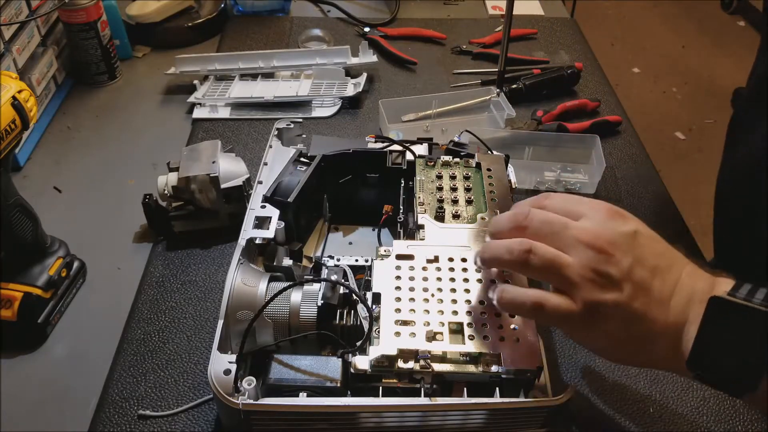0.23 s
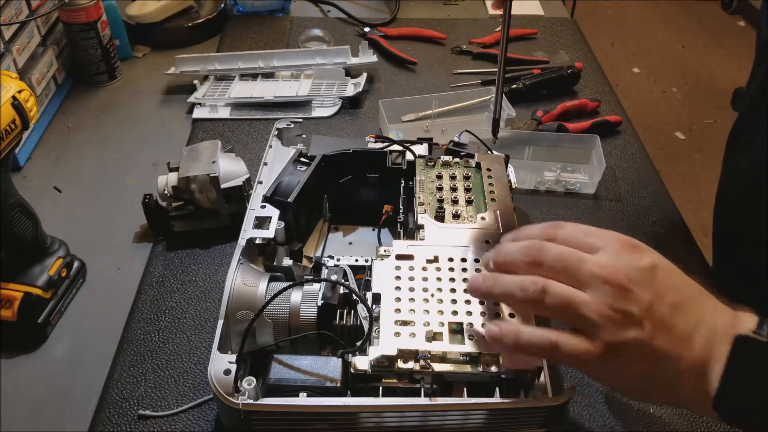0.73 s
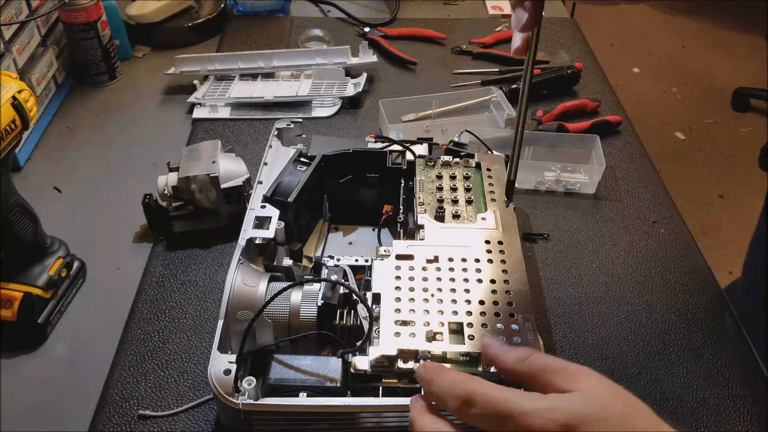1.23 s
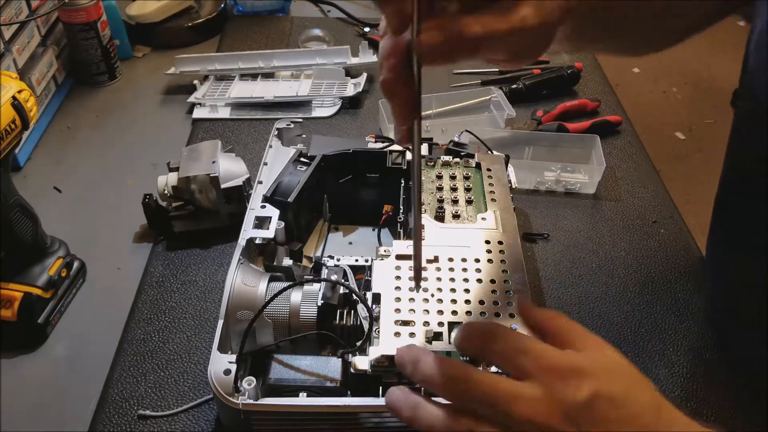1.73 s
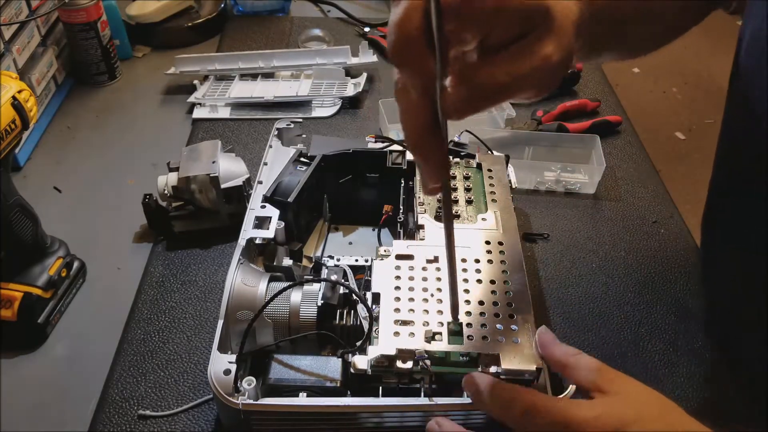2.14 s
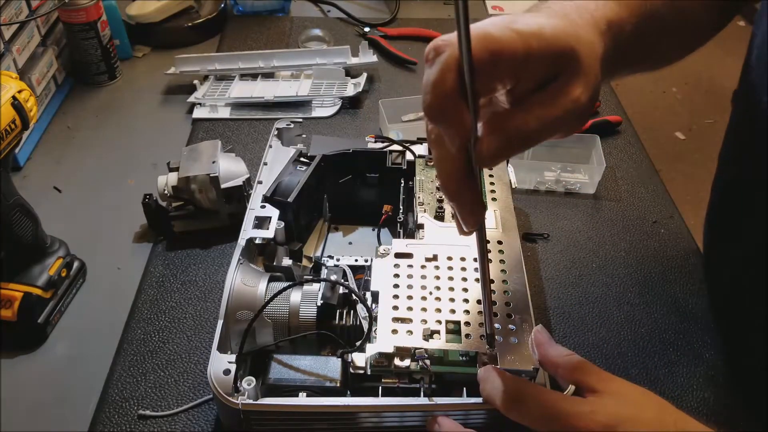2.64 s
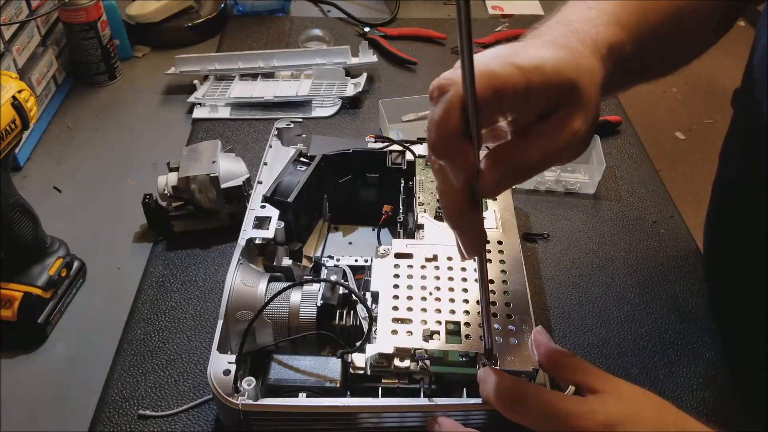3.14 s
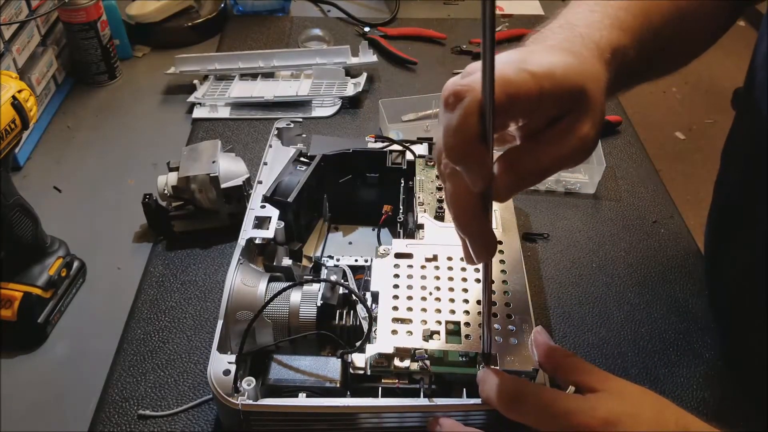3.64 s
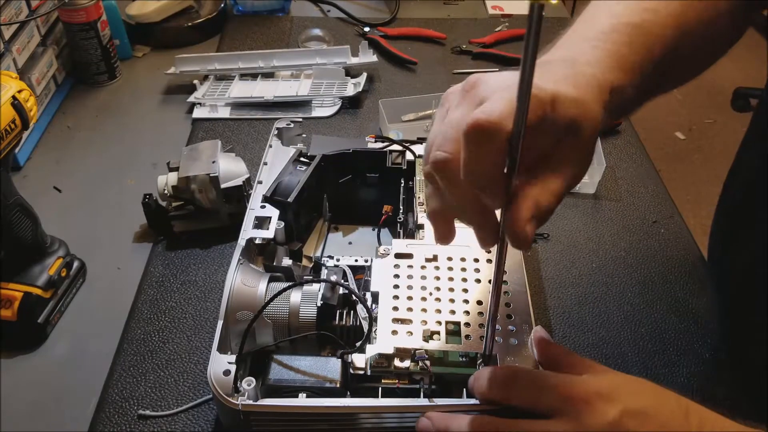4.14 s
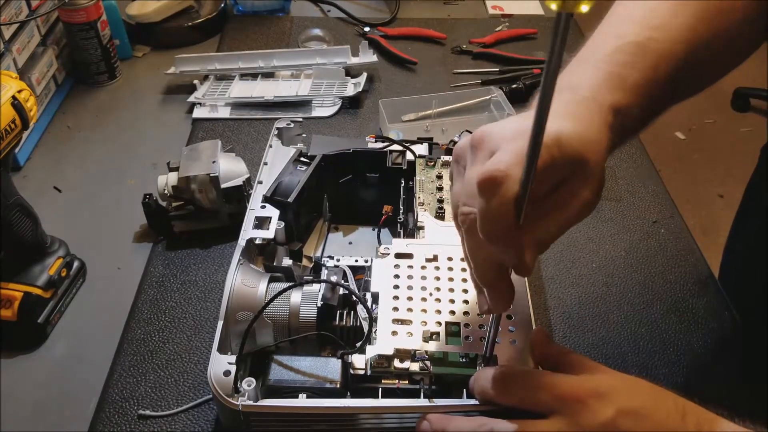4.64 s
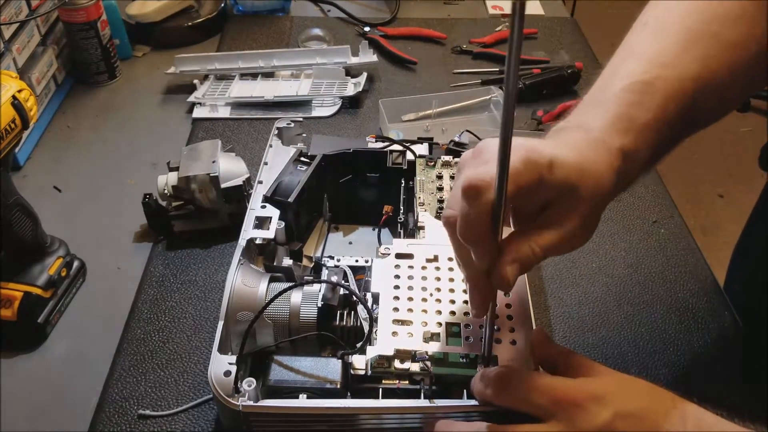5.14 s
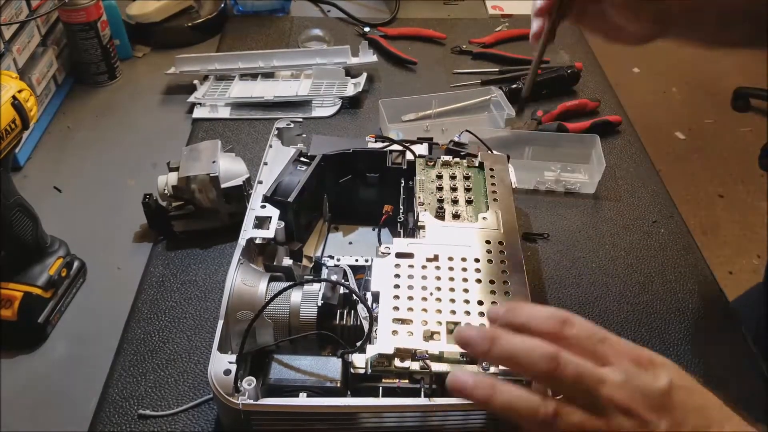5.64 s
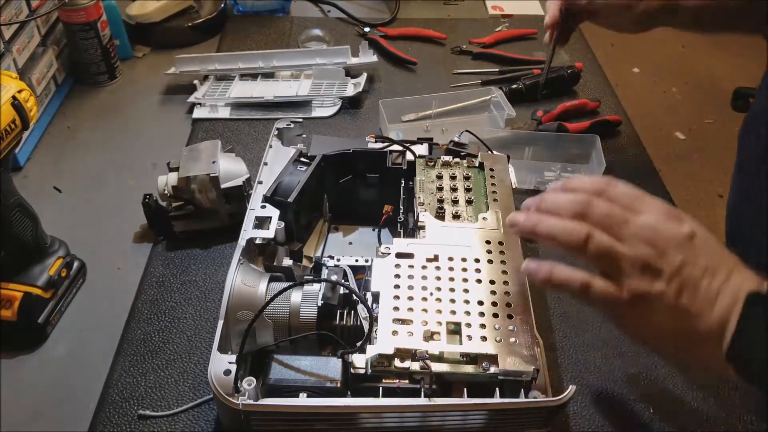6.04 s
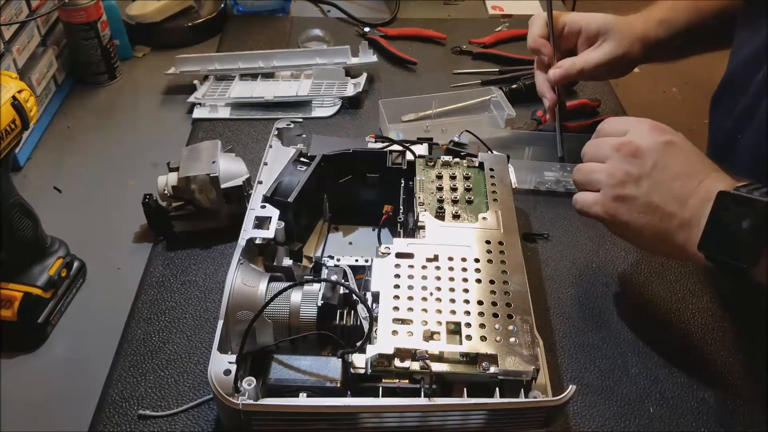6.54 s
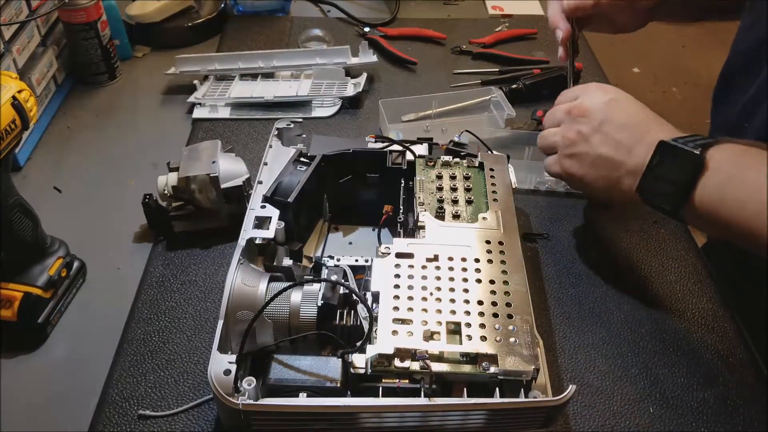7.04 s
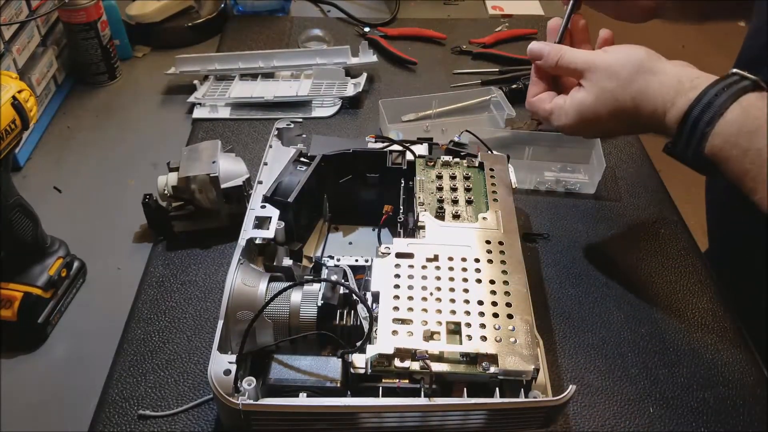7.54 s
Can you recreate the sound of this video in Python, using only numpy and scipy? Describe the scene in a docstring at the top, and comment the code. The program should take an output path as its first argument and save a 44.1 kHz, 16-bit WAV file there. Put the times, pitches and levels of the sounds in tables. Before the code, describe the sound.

Light metallic ticks, scrapes and a few ringing knocks as a small screw is driven in, with motors humming nearby.

```python
"""Screwdriver at the workbench

Close up, on a stereo pair in a small room: a small screw is driven into a perforated metal plate
in a plastic case. A hand slides over the case; the tip skids to the screw, grinds it round, squeaks,
knocks the plate into ringing and slips out. Later, loose screws tick in a tray.
Nearby motors hum and slowly beat, over ventilation rumble and hiss."""
import sys
import numpy as np
from scipy import signal
from scipy.fft import rfft, irfft, next_fast_len
from scipy.io import wavfile
from scipy.ndimage import map_coordinates

SR = 44100
rng = np.random.default_rng(int(sys.argv[2]) if len(sys.argv) > 2 else 0)


def persist_wave(psi):
    """Save psi, clipped to +-1, as 16-bit WAV."""
    counts = np.round(np.clip(psi, -1, 1) * 32767).astype(np.int16)
    wavfile.write(sys.argv[1], SR, np.atleast_2d(counts).T)


N = 342954
TIME = np.arange(N) / SR


# close up: first the plate ringing on around the knock at 3.64 s, then, in the later rows,
# the screw grinding round: (middle [s], length [s], level [dB], pitch [Hz])
PLATE_SWELLS = [(3.62, 0.095, -64, 1290), (4.095, 0.08, -54, 1950), (4.426, 0.055, -57.5, 2430),
                (4.484, 0.044, -57.5, 1220), (4.908, 0.075, -72, 1160), (5.041, 0.051, -75.5, 1300),
                (5.408, .048, -68, 1000), (5.511, .06, -68.5, 1350)]

def plate_swells(case_db=0.5, squeal_db=4.0, rasp_db_per_octave=7):
    """Plate and case sound on around a knock, or as the screw turns; higher swells rasp more."""
    out = np.zeros((2, N))
    for s, length, db, hz in PLATE_SWELLS:
        rasp_db = -4 + rasp_db_per_octave * np.log2(hz / 1970)
        layers = [(db, grinding), (db + rasp_db, rasping), (db + squeal_db, squeal(hz))]
        out += friction(s, length, layers, db + case_db)
    return out


# blows on the plate and, in the last two rows, the hand bumping the case: (time [s], slip [s], ring level [dB],
# ring centre [Hz], # then relative to the ring: crack [dB], ping [dB], thud [dB])
KNOCKS = [ (3.585, 0.0016, -51, 1020, -5.5, -8, -3), (3.643, 0.0016, -33, 1430, -8.5, -13, -23),
          (3.771, 0.0048, -55.5, 1800, -4, -5.5, -7), (3.9708, 0.0011, -27.5, 2300, -7.5, -7.5, -9.5),
          (4.349, 0.0034, -51.5, 1800, -17, -19, -8), (4.676, 0.012, -32.5, 1720, 6.5, -9, -17.5),
          (4.882, 0.0022, -60, 1910, -19, -23, -5), (5.387, .004, -70.5, 1100, -8, -20, 9),
          (5.816, .003, -65, 620, -20, -23, 10.5), (5.837, 0.0026, -54, 750, -24, -26, -5)]

def knocks(ping_hz=6300, top_hz=12600, crack_db_per_octave=21):
    """Blows ring the plate, ping the shaft and thud the case; a harder crack reaches higher. The hand's bumps
    on the case sound the same way, mostly thud."""
    return sum(contact(s, slip, db + crack, top_hz * 2 ** (crack / crack_db_per_octave),
                       db + ping, ping_hz, plate_db=db, plate_hz=hz, thud_db=db + thud)
               for s, slip, db, hz, crack, ping, thud in KNOCKS)


# the tip skids: (start [s], length [s], grinding level [dB], rasp over grinding [dB], squeal [Hz])
SKIDS = [ (0.446, 0.054, -67.5, 1, 4350), (1.352, 0.077, -71, 1, 1080), (1.597, .04, -65.5, -7, 1870),
         (1.83, 0.037, -67, 0, 1820), (2.168, 0.044, -65, -0.5, 810), (2.253, 0.049, -61.5, 2.5, 810),
         (2.439, .05, -74, 5, 3120), (3.17, .06, -61.5, 3, 3600), (5.534, 0.045, -53.5, 1.5, 840)]

def skids(landing_db=-1, case_db=-3, squeal_db=-3):
    """The tip lands with a click, then scrapes across the plate."""
    out = np.zeros((2, N))
    for s, length, db, rasp, hz in SKIDS:
        click_db = db + rasp + landing_db
        out += contact(s, slip=0.0048, crack_db=click_db, top_hz=10500, ping_db=click_db - 1,
                       ping_hz=6500, plate_db=db - 4, plate_hz=1560, thud_db=db - 11)
        layers = [(db, grinding), (db + rasp, rasping), (db + squeal_db, squeal(hz))]
        scrape = friction(s + length / 2, length, layers, db + case_db)
        out += scrape * (TIME > s)  # silent until the tip is down
    return out


# the tip swivels in the screw head: (middle [s], length [s], level [dB])
SQUEAKS = [(1.675, 0.037, -72), (2.342, 0.039, -62.5), (3.849, 0.038, -64.5), (3.939, .11, -65),
           (5.131, 0.052, -64.5), (5.324, 0.054, -71)]

def squeaks(lower_hz=3100, upper_hz=4260):
    """Under light pressure the tip squeaks, always near the same two pitches."""
    upper = lambda hz: bell(hz, upper_hz, width=.03)
    out = np.zeros((2, N))
    for s, length, db in SQUEAKS:
        layers = [(db, squeal(lower_hz)), (db - 8, upper), (db - 7, grinding), (db - 4, rasping)]
        out += friction(s, length, layers, case_db=db - 6)
    return out


# light clicks of the tip on the screw head: (time [s], slip [s], ping level [dB], ping [Hz])
TIP_TICKS = [(.45, .003, -59, 6860), (2.347, .008, -62, 4150), (3.167, 0.0026, -53.5, 4800),
             (3.495, .0008, -52, 11900), (3.57, .001, -60.5, 7300), (3.832, 0.0043, -72, 3900),
             (5.168, .001, -59, 3700), (5.525, 0.0013, -53.5, 7250), (5.624, 0.0018, -42.5, 6800)]

def tip_ticks():
    """Steel on steel: mostly ping, and the plate barely answers."""
    return sum(contact(s, slip, crack_db=db - 6, top_hz=13500, ping_db=db, ping_hz=hz, plate_db=db - 17)
               for s, slip, db, hz in TIP_TICKS)


# screws picked over in the tray: (time [s], slip [s], ping level [dB], ping [Hz])
TRAY_TICKS = [(6.567, 0.001, -56.5, 13100), (6.589, 0.011, -63.5, 7100), (7.229, .006, -73, 4940),
              (7.564, 0.0027, -63.5, 11400)]

def tray_ticks():
    """Loose screws touch each other, away from the plate."""
    return sum(contact(s, slip, crack_db=db - 3, top_hz=2 * hz, ping_db=db, ping_hz=hz)
               for s, slip, db, hz in TRAY_TICKS)


# a hand on the case: (middle [s], length [s], level [dB])
RUBS = [(1.047, 0.084, -65.5), (1.162, 0.19, -65.5), (1.27, 0.072, -66.5), (1.399, 0.099, -60),
        (5.866, 0.074, -57.5)]

def hand_rubs(boom_hz=235):
    """Skin rubs dully on the hollow case."""
    return sum(friction(s, length, [(db - 1, squeal(boom_hz)), (db - 15, grinding)], case_db=db)
               for s, length, db in RUBS)


# fingers on smooth steel: (middle [s], length [s], level [dB], hiss centre [Hz])
SLIDES = [(0.423, 0.21, -79.5, 8200), (.84, 0.26, -75, 8440), (1.2, 0.54, -76, 8260),
          (1.597, 0.16, -77, 8030), (1.924, 0.059, -69, 7550)]
# a lower resonance under the long slide: (middle [s], length [s], level [dB], centre [Hz])
SLIDE_DRONE = (1.07, .5, -79, 2126)

def finger_slides():
    """Skin slides along the steel with two narrow strands of hiss and, once, a lower drone."""
    def strands(centre_hz):
        return lambda hz: bell(hz, centre_hz, 0.065) + amp(-7) * bell(hz, 0.8 * centre_hz, 0.044)
    hiss = sum(friction(s, length, [(db, strands(hz))], grain_db=2.0) for s, length, db, hz in SLIDES)
    s, length, db, drone_hz = SLIDE_DRONE
    drone = friction(s, length, [(db, lambda hz: bell(hz, drone_hz, width=0.037))], grain_db=4.0)
    return hiss + drone


# colour of the rubbed case: (frequency [Hz], level [dB])
CASE_RUB = [(70, -16), (140, 0), (280, -0.5), (420, -1), (600, -10), (850, -14.5), (1500, -13), (4000, -44)]

def friction(s, length, layers, case_db=-120, grain_db=1.5, echo_s=0.018, wet=0.26):
    """Friction swells and fades around time s in tiny uneven slips; layers are (level [dB], colour)."""
    t = np.arange(SR) / SR - .5
    slips = unit(amp(grain_db * random_curve((t + .5) * 260)))
    power = np.exp(-np.abs(2 * t / length).clip(0, 20) ** 1.84) * slips ** 2
    keep = np.exp(-1 / (echo_s * SR))
    lingering = signal.lfilter([1 - keep], [1, -keep], power)  # the room holds the sound briefly
    envelope = np.sqrt((1 - wet) * power + wet * lingering)
    bright = sum(amp(db) * noise(gain, SR) for db, gain in layers) * pan_right(1.2)
    case = amp(case_db) * noise(colour(CASE_RUB), SR)
    return placed(s - .5, envelope * (bright + case))


# modes of the steel plate and of the plastic case: (frequency [Hz], level [dB], t60 [s])
PLATE_MODES = [(823, -5, 0.22), (1050, -10.5, 0.21), (1180, -22, 0.74), (1239, -22, 0.25),
               (1540, -3.5, 0.095), (1595, -3.5, 0.26), (1690, -4.5, 0.075), (1795, 0, 0.069),
               (1891, -5, 0.13), (1910, -5.5, 0.036), (1870, -16, 0.35), (1990, -6, 0.11),
               (2300, -23, 0.075), (2420, -33, 0.043), (2538, -2.5, 0.14), (2820, -47, .17)]
CASE_MODES = [(128, 0, .17), (305, -5, .18), (372, -10, .13), (442, -2, .19), (482, -10, .15),
              (660, -14, .12)]
# colour of a crack of steel on steel: (frequency [Hz], level [dB])
CRACK = [(150, -11.5), (600, -1), (1700, -2), (3200, 1), (5000, 1.5), (7500, 4), (9500, -2), (12700, 2),
         (16000, 0)]

def contact(s, slip, crack_db, top_hz, ping_db, ping_hz, plate_db=-120, plate_hz=2200, thud_db=-120):
    """One contact at time s cracks and pings through the shaft, rings the plate and thuds the case."""
    t = np.arange(SR // 3) / SR
    age = np.maximum(t - slip, 0)  # ringing and echoes decay once the tip stops slipping
    direct = amp(7.5) * decay(t, t60=0.02)
    bench = amp(-1.5) * decay(age, t60=0.11)
    walls = amp(-8) * decay(age, t60=0.25)
    fade = np.linalg.norm([direct, bench, walls], axis=0)
    crack_colour = lambda hz: colour(CRACK)(hz) * struck_shaft(hz) / np.hypot(1, (hz / top_hz) ** 2)
    crack = amp(crack_db) * noise(crack_colour, len(t))
    ping = amp(ping_db) * noise(lambda hz: bell(hz, ping_hz, width=0.093) * struck_shaft(hz), len(t))
    spot = lambda hz: bell(hz, plate_hz, width=0.45)  # where the plate is hit decides which modes answer
    rattle = fade * noise(lambda hz: spot(hz) * colour(GRIND)(hz), len(t))  # the plate sits loose
    ringing = ring(PLATE_MODES, t, age, spot, scatter_db=-3.5)
    plate = amp(plate_db) * (amp(-3.5) * ringing + amp(-5) * rattle)
    thud = amp(thud_db) * ring(CASE_MODES, t, age, np.ones_like, scatter_db=0)
    rise = 1 - np.exp(-t / (0.00014 + 0.73 * slip))
    swell = 1 - np.exp(-t / 0.0017)  # large parts take a moment to get moving
    small_parts = fade * (crack + ping) * pan_right(1.4)
    large_parts = swell * (plate + thud) * pan_right(.9)
    return placed(s, rise * (small_parts + large_parts))


def ring(modes, t, age, weight, scatter_db):
    """Decaying modes; higher ones reach the two microphones further out of phase."""
    hz, db, t60 = np.transpose(modes)[:, :, None]
    gain = weight(hz) * amp(db + scatter_db * rng.standard_normal((2, len(hz), 1)))
    spread = np.minimum(hz / 1400, .9)
    phase = rng.uniform(0, 2 * np.pi, hz.shape) + spread * rng.standard_normal(gain.shape)
    waves = gain * np.sin(2 * np.pi * hz * t + phase) * decay(age, t60)
    return waves.sum(1) / np.sqrt(np.sum(gain ** 2) / 4)  # rms about 1 at the start


# broad colour of the scraped plate: (frequency [Hz], level [dB])
GRIND = [(300, -9), (600, -4), (820, 4.5), (1200, 4.5), (1800, -1), (2600, -3), (3300, -9.5), (5000, -10),
         (12000, -58)]

def grinding(hz):
    """Colour of friction heard through the plate."""
    return colour(GRIND)(hz) * peaks(hz, PLATE_MODES, width_hz=45, lift_db=5)


# broad colour of the scraped shaft: (frequency [Hz], level [dB])
RASP = [(1200, -44.5), (2600, 4.5), (3500, 1), (5000, -0.5), (6800, 0.5), (8300, -3.5), (10000, -5),
        (13500, -4.5), (16000, -20)]
# resonances of the screwdriver's shaft: (frequency [Hz], prominence [dB])
SHAFT_MODES = [(3914, 3), (4444, 4), (5445, 7), (5780, 5), (6157, 11), (6560, 7), (7590, 6), (7960, 9),
               (9660, 6), (10100, 5), (12335, 8), (12549, 8), (12863, 9), (14032, 6)]

def rasping(hz):
    """Colour of friction heard through the shaft."""
    return colour(RASP)(hz) * peaks(hz, SHAFT_MODES, width_hz=45, lift_db=-3)


def struck_shaft(hz):
    """Colour of one contact on the shaft: each spot favours its own few of the many high modes."""
    return peaks(hz, SHAFT_MODES, width_hz=34, lift_db=-2) * ripple(hz, depth_db=3, spacing_hz=107.6)


def squeal(centre_hz):
    """Colour of an uneven squeal or, pitched low, a boom."""
    return lambda hz: bell(hz, centre_hz, width=0.17) * ripple(hz, depth_db=7, spacing_hz=129.8)


# nearby motors, and the lines of mains hum: (frequency [Hz], rms level [dB])
MOTORS = [(53.91, -60), (58.42, -53), (58.74, -49)]
HUM_LINES = [(35.94, -79.5), (76.7, -65.5), (117.5, -62), (120, -61), (125.8, -60), (143.7, -86.5),
             (318, -80.5), (360.3, -78.5)]

def motor_hum(in_step_s=2.03):
    """Motors at nearly equal speeds drift in and out of step, over mains hum."""
    motors = sum(amp(db) * np.cos(2 * np.pi * hz * (TIME - in_step_s)) for hz, db in MOTORS)
    lines = sum(amp(db) * np.sin(2 * np.pi * (hz * TIME + rng.random()) + 0.15 * wobble(2.143))
                for hz, db in HUM_LINES)
    return np.sqrt(2) * (motors + lines)


# a fan in the background: (frequency [Hz], base level [dB])
FAN_TONES = [(953, -95.5), (1087, -82.5), (1270, -81.5), (1453, -97.5)]
# its rise and fall: (time [s], gain [dB])
FAN_SWELL = [(0, 2), (1.5, 2), (3, -5.5), (5, 1.5), (7, -5), (7.8, -1.5)]

def fan_whine():
    """A fan's faint tones waver in level and phase."""
    mic_phase = np.array([[0], [.9]])
    tones = sum(amp(db + wobble(3)) * np.sin(2 * np.pi * hz * TIME + mic_phase + .5 * wobble(14))
                for hz, db in FAN_TONES)
    return np.sqrt(2) * tones * amp(np.interp(TIME, *np.transpose(FAN_SWELL)))


# colours of the ventilation and the hiss, all around the microphones: (frequency [Hz], level [dB])
VENTILATION = [(15, -29.5), (33, 4.5), (50, -9.5), (75, -1.5), (90, -5.5), (125, -3), (160, -5), (195, -17),
               (250, -12.5), (340, -24.5), (400, -26.5), (750, -36.5), (1400, -33.5), (4000, -49.5)]
HISS = [(200, -5), (1500, -3.5), (3000, 4), (5500, -1), (10000, -0.3), (15500, 0)]

def room_tone(air_db=-56.5, hiss_db=-78):
    """Ventilation rumble and an even hiss."""
    rumble = amp(air_db + 0.13 * wobble(1.2)) * noise(colour(VENTILATION))
    return rumble + amp(hiss_db) * noise(colour(HISS))


def noise(gain, size=N):
    """Stereo noise of rms 1: in a room the bass is alike at both microphones, the treble unrelated."""
    # (frequency [Hz], correlation)
    alike = [(60, 0.98), (130, 0.93), (290, 0.73), (700, 0.22), (1400, 0.057), (3000, 0.012)]
    angle = lambda hz: np.arccos(along(alike, hz)) / 2
    white = rng.standard_normal((2, size))
    mid, side = filtered(white, lambda hz: gain(hz) * [np.cos(angle(hz)), np.sin(angle(hz))])
    return unit(np.array([mid + side, mid - side]))


def amp(db):
    """Decibels to gain."""
    return 10 ** (np.asarray(db) / 20)


def unit(x):
    """Scale to rms 1."""
    return x / np.sqrt(np.mean(x ** 2) + 1e-20)


def decay(t, t60):
    """Gain that falls 60 dB in t60 seconds."""
    return amp(-60 * t / t60)


def pan_right(db):
    """Gains db down at the left microphone and db up at the right."""
    return amp([[-db], [db]])


def along(points, hz):
    """(Hz, value) points read on a log axis."""
    f, v = np.transpose(points)
    return np.interp(np.log(hz + 1), np.log(f + 1), v)


def colour(points):
    """Gain of frequency from (Hz, dB) points."""
    return lambda hz: amp(along(points, hz))


def bell(hz, centre_hz, width):
    """Gain of one resonance; width is a share of its centre."""
    return 1 / (1 + (np.log((hz + 1) / centre_hz) / width) ** 2) ** 0.76


def peaks(hz, modes, width_hz, lift_db):
    """Gain that lifts noise at each (Hz, dB) mode."""
    power = sum(amp(db + lift_db) ** 2 / (1 + ((hz - f) / width_hz * 2) ** 2) for f, db, *_ in modes)
    return np.sqrt(1 + power)


def random_curve(position, knots=600):
    """A smooth curve through random knots one unit apart."""
    return map_coordinates(rng.standard_normal(knots), [position], mode="wrap")


def wobble(rate):
    """A smooth random drift, rate knots a second."""
    return random_curve(TIME * rate, knots=4000)


def ripple(hz, depth_db, spacing_hz):
    """Randomly uneven gain over frequency, shallower in the bass."""
    return amp(depth_db * random_curve(hz / spacing_hz) * np.minimum(hz / 2500, 1))


def filtered(x, response):
    """x times a response of frequency."""
    size = next_fast_len(x.shape[-1] + 8192)
    return irfft(rfft(x, size) * response(np.fft.rfftfreq(size, 1 / SR)), size)[..., :x.shape[-1]]


def placed(s, sound):
    """A stereo sound set at time s on a silent track."""
    return np.pad(sound, ((0, 0), (max(round(s * SR), 0), N)))[:, :N]


def scene():
    """The work on the bench, slightly right of centre, over the room's hum."""
    hands = hand_rubs() + finger_slides()
    screwdriver = skids() + squeaks() + plate_swells() + knocks() + tip_ticks()
    return hands + screwdriver + tray_ticks() + motor_hum() + fan_whine() + room_tone()


def record(dry, top_hz=15950):
    """The microphones keep nothing above their band limit."""
    return filtered(dry, lambda hz: hz < top_hz)


dry = scene()
out = record(dry)
persist_wave(out)
```